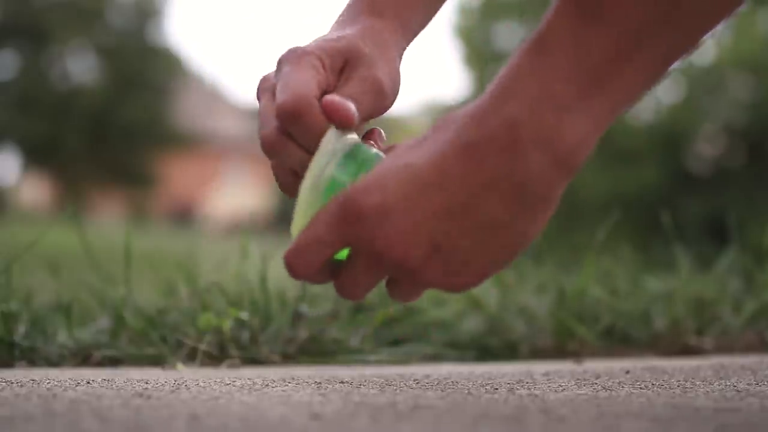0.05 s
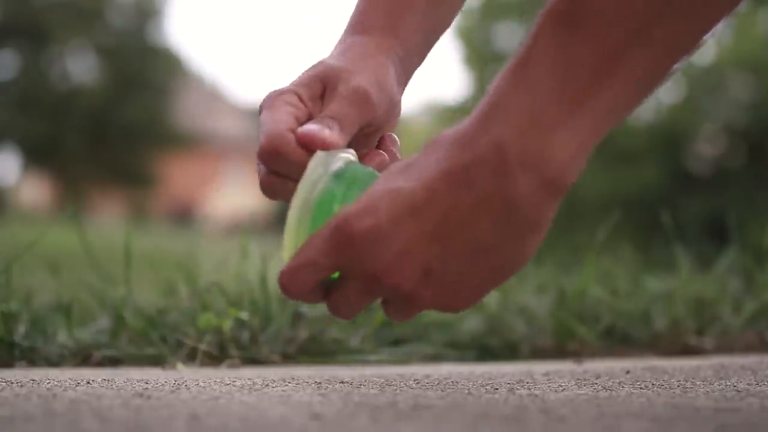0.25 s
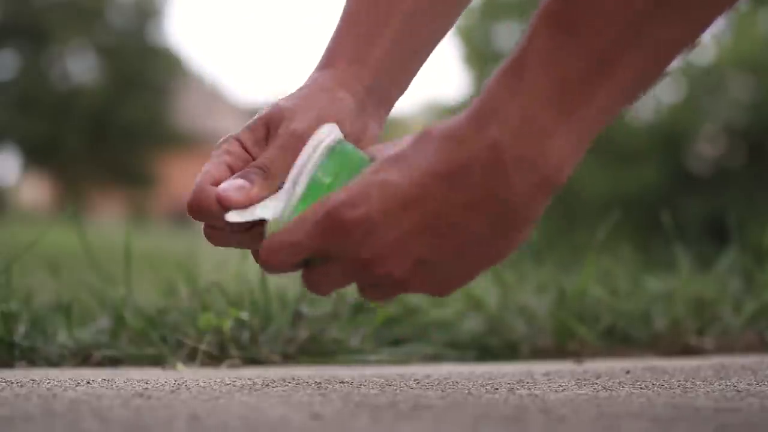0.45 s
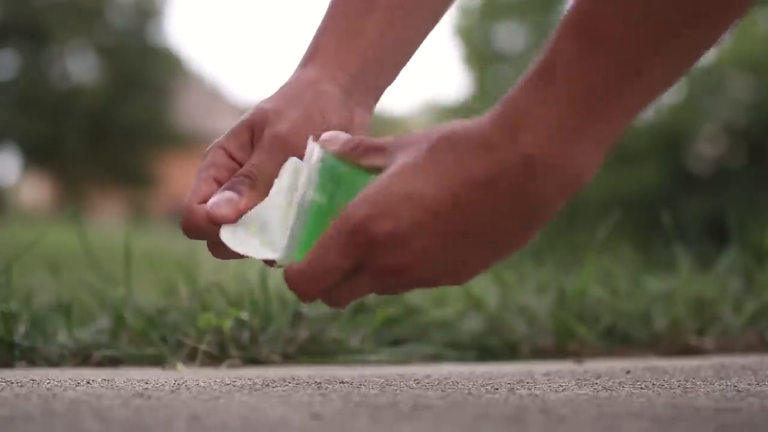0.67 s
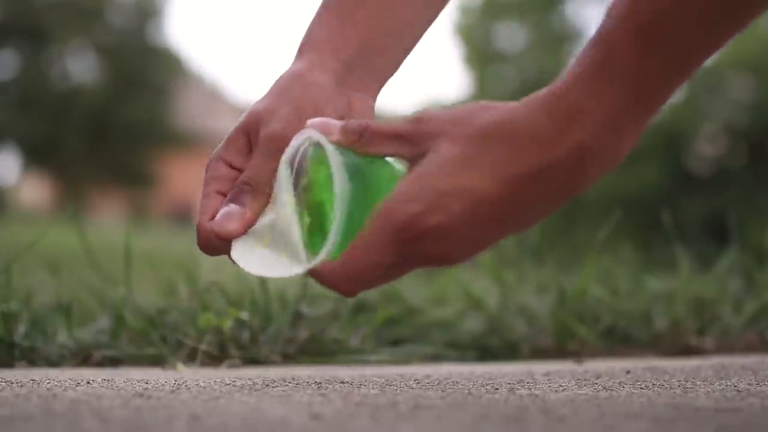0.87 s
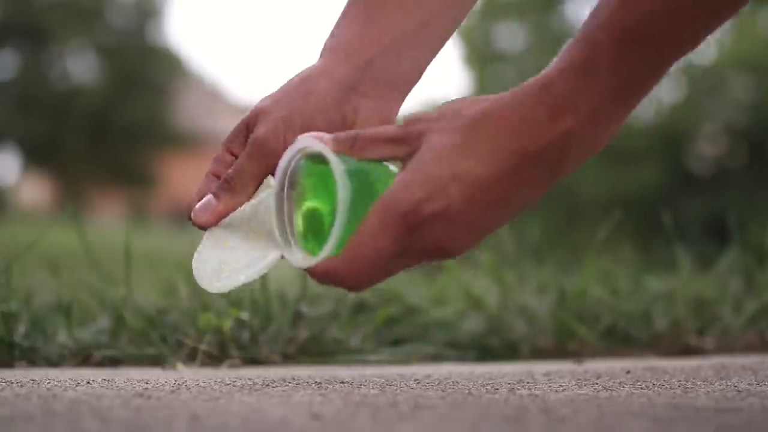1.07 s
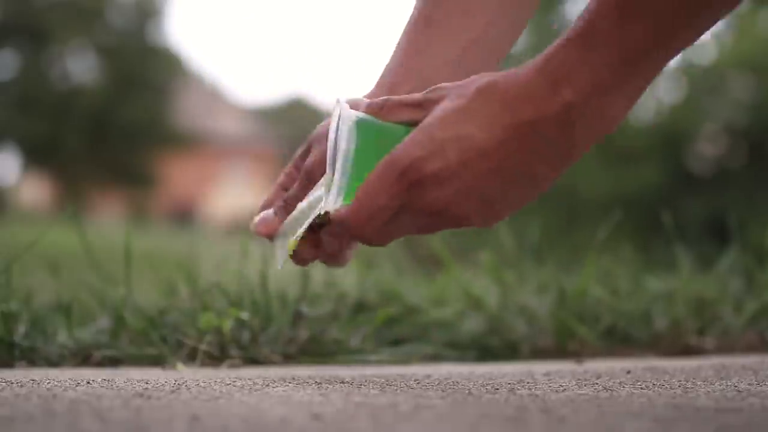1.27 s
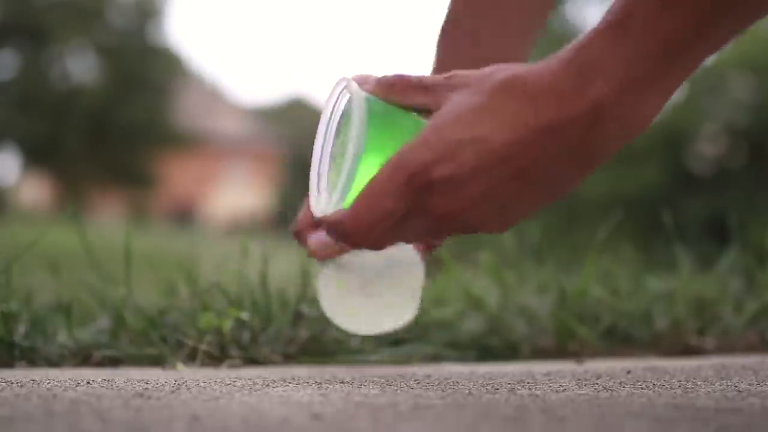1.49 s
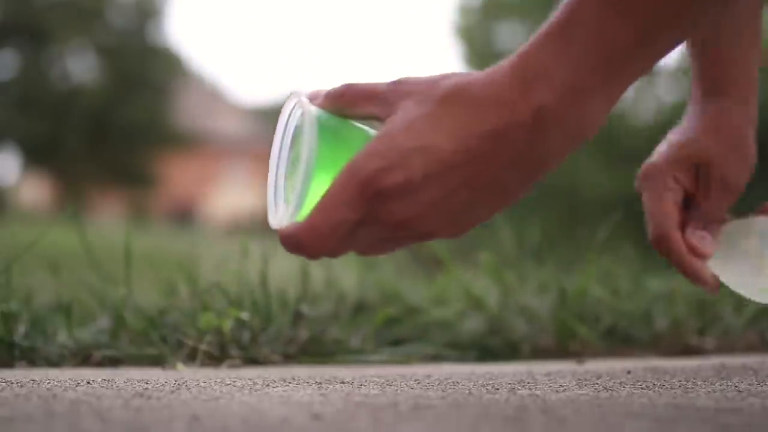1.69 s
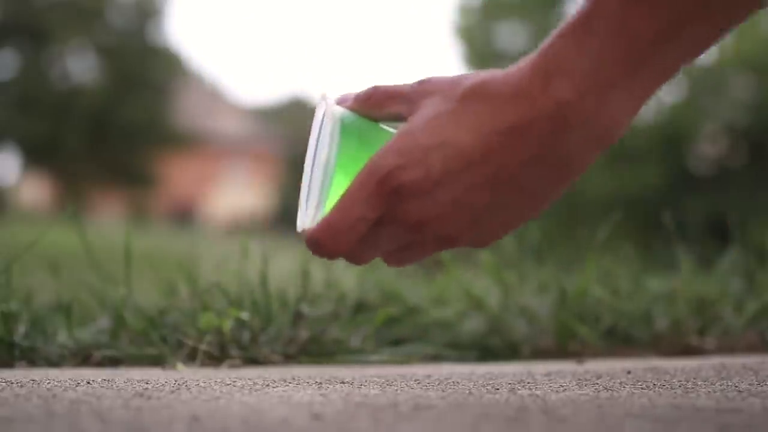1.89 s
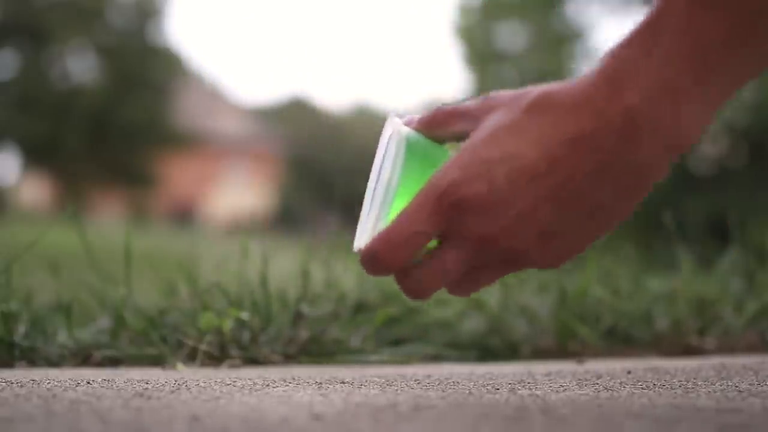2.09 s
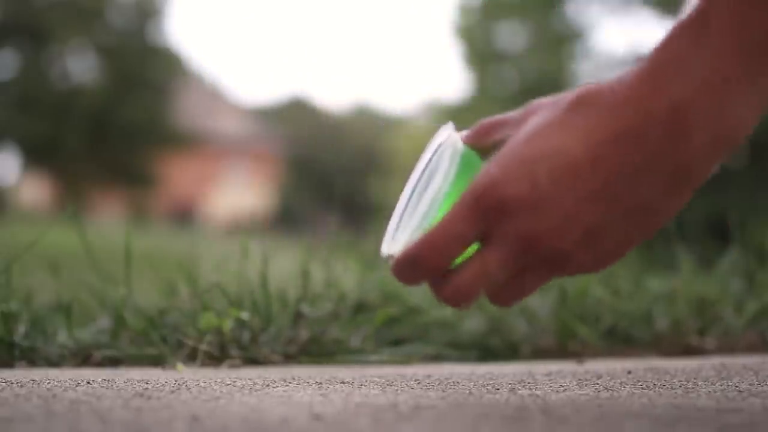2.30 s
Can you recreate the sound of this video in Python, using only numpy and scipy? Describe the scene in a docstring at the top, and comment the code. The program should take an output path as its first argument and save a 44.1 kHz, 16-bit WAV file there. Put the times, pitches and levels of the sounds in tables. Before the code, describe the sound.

A plastic lid peels off a small cup with sharp snaps and crackles, outdoors.

```python
"""In a garden, insects shrill, a far motor hums and a breeze rumbles on the microphone. Close by, fingers rub a
small plastic cup and pick at its tab; each slip or buckle of the film lid snaps. Now and then a soft low pop
sounds. The seal gives way with a short squeal and crackles as it tears. The loose lid flutters, twangs free at
about one second and is crumpled with more snaps, leaving mostly the garden at the end. Throughout, the recorder
turns everything down after loud snaps and holds back the peaks."""
import sys
import numpy as np
from scipy import signal
from scipy.fft import rfft, irfft
from scipy.io import wavfile
from scipy.ndimage import uniform_filter1d, minimum_filter1d

SR = 44100
rng = np.random.default_rng(int(sys.argv[2]) if len(sys.argv) > 2 else 0)


def wav_record(signal):
    """Record a signal, one row per channel, as 16-bit PCM in the file named by sys.argv[1]."""
    frames = np.transpose(np.atleast_2d(signal))
    bounded = np.clip(frames, -1, 1)
    # unit amplitude maps onto the largest positive 16-bit level
    quanta = np.round(bounded * 32767).astype(np.int16)
    wavfile.write(sys.argv[1], SR, quanta)


N = 108045

# Most levels are relative: the functions below scale the sounds further.
# tone of the garden's background hiss (frequency [Hz], level [dB])
AIR_TONE = [(20, -6.5), (45, -3.5), (75, -4), (115, 5), (160, -1), (230, -1.5), (330, -4), (700, -8),
            (1100, -3), (1700, -13), (2600, -17.5), (4000, -21.5), (6000, -26.5), (7800, -23.5),
            (9000, -27.5), (16000, -37)]
# hum of the far motor (time [s], lowest note [dB], octave above [dB])
MOTOR_LEVELS = [(0, -42.5, -60), (.38, -42.5, -52), (.8, -44.5, -50), (1.3, -54, -62), (1.7, -51, -45.5),
                (1.9, -48.5, -43), (2.15, -51, -49.5), (2.45, -44, -54)]
# tone of the insect chorus (frequency [Hz], level [dB])
CHORUS_TONE = [(5500, -62), (6400, -20), (6650, -8), (6820, -7.5), (7000, -1.5), (7150, -21), (7380, -15.5),
               (8500, -38)]
# swelling of the chorus (time [s], level [dB])
CHORUS_SWELL = [(0, -48), (.6, -46.5), (1.2, -48), (1.7, -45), (1.83, -43.5), (1.92, -52.5), (2.05, -44.5),
                (2.16, -48.5), (2.29, -44.5), (2.45, -53.5)]
# gusts on the microphone (time [s], level [dB])
GUSTS = [(0, -35), (.1, -66), (.52, -59), (.66, -35.5), (.9, -44.5), (1.1, -72), (1.37, -45), (1.45, -75)]
# finger strokes on the plastic (middle time [s], half length [s], level [dB])
STROKES = [(0.026, 0.022, -39.5), (0.065, 0.012, -38.5), (.169, 0.0024, -38), (0.918, 0.038, -38),
           (1.431, 0.0045, -20.5), (1.584, 0.018, -40.5), (1.696, 0.079, -40), (2.164, 0.0075, -38)]
# tone of a stroke (frequency [Hz], level [dB])
STROKE_TONE = [(300, 5), (1300, 7), (3500, 2.5), (5500, 1.5), (8000, -22), (16000, -15)]
# snaps (time [s], film pitch [Hz], film level [dB], wall pitch [Hz], body level [dB], crack level [dB])
SNAP_EVENTS = [(0.1469, 1900, -14.5, 1190, -17, -34), (0.1725, 1620, -15.5, 734, -28, -54),
               (0.2102, 1400, -5.5, 3750, -19, -52), (0.3044, 5540, -26, 564, -47, -41),
               (0.316, 750, -20, 1620, -30.5, -48), (0.4322, 5280, -1, 1630, 2, -12),
               (0.4623, 3630, -7, 1800, -6.5, -36), (0.4883, 2600, -3, 1840, -5.5, -46),
               (0.5033, 2220, -11, 3550, -26, -49), (0.5118, 3920, -11, 2410, -11, -17),
               (0.5196, 2100, -12, 3660, -8.5, -20), (0.5364, 4460, -20, 2100, -24, -30),
               (0.567, 4020, -14, 2340, -11, -37), (0.573, 4200, -24, 1560, -22, -37),
               (0.5948, 1920, -22.5, 1040, -23.5, -69), (0.634, 920, -13.5, 2040, -12.5, -20.5),
               (0.6511, 2420, -12, 1630, -10, -36), (0.6757, 1800, -23, 3420, -19.5, -37),
               (0.687, 1780, -23, 2670, -28, -55), (0.7189, 1770, -14.5, 614, -18.5, -55),
               (0.7683, 3450, -22, 1190, -15.5, -49), (0.772, 1850, -33, 1100, -15.5, -44),
               (0.784, 1480, -25, 4930, -15.5, -28), (0.7887, 5200, -16.5, 2750, -11, -26),
               (0.7978, 2750, -28, 1130, -16, -20), (0.8089, 5900, -15, 2890, -22, -28),
               (0.8125, 4930, -14, 3560, -20, -21), (0.8164, 5000, -18, 3360, -28, -18),
               (0.8308, 5300, -13, 2700, -13, -15), (0.8587, 2860, -22, 1130, -22, -31),
               (0.8643, 5700, -25, 1970, -20.5, -37), (0.901, 5180, -10, 2800, -9, -7),
               (0.906, 1720, -15, 3100, -17, -31), (0.9171, 3480, -15.5, 2600, -17, -26),
               (0.9606, 1250, -24, 555, -22, -47), (0.968, 3560, -22, 4570, -32, -36),
               (0.9728, 4440, -19.5, 1940, -35, -36), (0.9793, 1400, -14.5, 540, -14, -25),
               (0.982, 1920, -25, 590, -19.5, -28), (1.0141, 4500, 3.5, 1930, -8, -1),
               (1.0241, 3100, -10, 1950, -7, -17), (1.0262, 4450, 2, 3320, 1, -1),
               (1.0288, 2860, 3, 590, -10, 6.5), (1.0365, 5040, -7, 2970, -11, -23),
               (1.043, 3450, -9, 1050, -9, -20), (1.046, 3070, -15, 4940, -5, -8),
               (1.0472, 3380, -7, 4960, -13, -15), (1.0504, 3620, -10, 2640, -12, -1.5),
               (1.058, 3400, -12, 2000, -8.5, -26), (1.0951, 3140, -17, 1100, -11.5, -30),
               (1.1094, 1690, -4.5, 2700, -6, -33), (1.1389, 3095, -19, 1420, -23, -40),
               (1.156, 3460, -4.5, 5040, -6.5, -9.5), (1.1607, 2080, -14, 5500, -13, -29),
               (1.1754, 2620, -9, 1160, -11.5, -42), (1.2057, 800, -20.5, 1740, -14, -54),
               (1.2632, 1910, -28, 2950, -23.5, -45), (1.3067, 1440, -29, 3360, -28.5, -42),
               (1.3946, 5600, -10, 2550, -14, -15), (1.3988, 4900, -14, 2460, -18.5, -9),
               (1.4048, 5740, -11, 3570, -13, -22), (1.407, 4970, -1, 3500, -3, -9),
               (1.4142, 5180, 9, 2460, -11, -8), (1.4354, 5060, -3, 3050, -7.5, -10),
               (1.4442, 3430, -25, 4950, -17, -24), (1.5511, 1680, -21, 2540, -21, -53),
               (1.6138, 3230, -25, 2440, -5.5, -22), (1.618, 3500, 3.5, 1365, -2.5, -4),
               (1.6361, 5300, 4.5, 2780, -4.5, -7), (1.809, 1410, -25, 560, -24.5, -40),
               (1.8751, 3180, -20, 1160, -20, -64), (2.1188, 3500, -28.5, 575, -33.5, -32.5)]
# the cup's own notes (pitch [Hz], level [dB], time to fade by 60 dB [s])
CUP_NOTES = [(624, -11, .014), (1181, -2, 0.022), (1750, -0.5, 0.012), (2355, 2, 0.005), (3446, 4, 0.013),
             (4295, -0.5, 0.0073), (5250, 1, 0.0041), (5800, -5.5, 0.0091)]
# tone of bright cracks and ticks (frequency [Hz], level [dB])
CRACK_TONE = [(1000, -30), (5000, 7), (7500, 0), (9000, 2), (11000, 0), (13000, -1.5), (16000, -4.5)]
# tone of the duller crackle and rattle (frequency [Hz], level [dB])
CRACKLE_TONE = [(170, -33), (380, -4.5), (900, -2.5), (1700, -1), (2600, -1.5), (3600, -0.5), (4500, -6),
                (5600, -6.5), (7500, -15), (11000, -27), (16000, -23.5)]
# soft low pops and dull clicks (time [s], level [dB])
LOW_POPS = [(.155, -23), (.175, -20.5), (0.2539, -20), (.272, -19), (1.026, -17.5)]
# tone of a low pop (frequency [Hz], level [dB])
LOW_POP_TONE = [(30, -10), (200, 2.5), (500, -8.5), (1500, -16), (6000, -35.5), (16000, -38.5)]
# crackle as the seal tears and the film rubs (time [s], level [dB])
TEAR_LEVEL = [(.429, -59), (.435, -11), (.447, -16.5), (.47, -19), (.5, -31), (.52, -20.5), (.55, -49.5),
              (.755, -60), (.775, -35.5), (.815, -35), (.85, -69), (.91, -36.5), (.95, -38), (.99, -27),
              (1.03, -16.5), (1.052, -20), (1.08, -61), (1.39, -42.5), (1.405, -21), (1.436, -24.5),
              (1.46, -38), (1.6, -57), (1.62, -21), (1.655, -43), (1.72, -61)]
# squeal as the seal first gives way (time [s], pitch [Hz], level [dB])
SQUEAL = [(.432, 5564, -36), (.4337, 5155, -9), (.4355, 5080, -20), (.4365, 1494, -4), (.441, 1770, -1.5),
          (.445, 1690, -10), (.456, 1690, -29)]
# flutter as the lid is bent back, freed and folded (time [s], level [dB])
FLUTTER_LEVEL = [(.5, -46), (.57, -46), (.74, -47.5), (.94, -61), (.975, -37), (1.0, -27), (1.035, -28),
                 (1.06, -31), (1.12, -47)]
# hollow notes of the loose lid (pitch [Hz], level [dB])
LID_NOTES = [(320, -1), (460, -2.5), (610, 2.5), (790, 1.5), (910, 2), (1070, -9)]
# the lid's lowest note as it springs free (time [s], pitch [Hz], level [dB])
LID_TWANG = [(.968, 285, -46), (.984, 303, -25), (1.003, 345, -31), (1.03, 258, -30), (1.05, 262, -26),
             (1.073, 282, -28), (1.09, 315, -38), (1.113, 342, -28), (1.135, 365, -46)]
# tone of the reflections (frequency [Hz], level [dB])
ECHO_TONE = [(200, 3), (2000, 4), (5500, 1), (8000, -10), (16000, -17)]


def amp(db):
    """Turns decibels into a number to multiply by."""
    return 10 ** (np.asarray(db) / 20)


def unit(x):
    """Scales a sound to an average power of 1."""
    return x / np.sqrt(np.mean(x ** 2) + 1e-20)


def unit_hit(x):
    """Scales a short sound to the energy of one millisecond at full level."""
    return x * np.sqrt(SR / 1000 / (np.sum(x ** 2) + 1e-20))


def curve(points):
    """Joins rows (time, value, ...) with straight lines; one curve per value column."""
    times, *columns = np.transpose(points)
    return [np.interp(np.arange(N) / SR, times, column) for column in columns]


def during(table):
    """On between a table's first and last time, off outside."""
    t = np.arange(N) / SR
    return (t > table[0][0]) * (t < table[-1][0])


def level_at(tone, hz):
    """Looks up a tone table's level in dB at the given frequencies."""
    table_hz, db = np.transpose(tone)
    return np.interp(np.log(hz + 1), np.log(table_hz + 1), db)


def colour(x, tone, size=4096):
    """Filters a sound to follow a tone table, with no ringing before the sound starts."""
    log_gain = np.log(amp(level_at(tone, abs(np.fft.fftfreq(size, 1 / SR)))))
    response = np.exp(np.conj(signal.hilbert(log_gain)))
    taps = np.fft.ifft(response).real[:size // 2]
    return signal.fftconvolve(x, taps)[:len(x)]


def add(mix, start_s, sound):
    """Mixes a sound in at the given time."""
    part = mix[max(round(start_s * SR), 0):][:len(sound)]
    part += sound[:len(part)]


def drift(rate_hz):
    """Random wavering, mostly slower than the given rate."""
    rolloff = 1 + (np.fft.rfftfreq(N, 1 / SR) / rate_hz) ** 4
    return unit(irfft(rfft(rng.standard_normal(N)) / rolloff, N))


def grains(per_s, spread_db):
    """Tiny clicks of uneven size at random times."""
    size = amp(spread_db * np.minimum(rng.exponential(1, N), 3.5)) * rng.choice([-1, 1], N)
    return size * (rng.random(N) < per_s / SR)


def garden_air():
    """A distant wash of noise, with patches of its tone drifting up and down."""
    frames = dict(nperseg=2048, noverlap=1536)
    hz, _, spectrum = signal.stft(rng.standard_normal(N), SR, **frames)
    patches = uniform_filter1d(rng.standard_normal(spectrum.shape), size=20, axis=0)  # across pitch
    patches = unit(uniform_filter1d(patches, size=8, axis=1))  # across time
    gain = amp(level_at(AIR_TONE, hz)[:, None] + 2 * patches)
    air = signal.istft(spectrum * gain, **frames)[1][:N]
    return amp(-41) * unit(air)


def motor(pitch_hz=107.5):
    """A far motor hums on a wavering low note and the octave above it."""
    phase = 2 * np.pi * np.cumsum(pitch_hz * (1 + .012 * drift(6.15))) / SR
    return sum(amp(db + 1.2 * drift(14)) * np.sin(k * phase)
               for k, db in enumerate(curve(MOTOR_LEVELS), 1))


def insects(first_s=.036, every_s=.1595, chirp_s=.055, top_hz=8200):
    """A shrill chorus swells and sinks; one insect repeats a thin chirp that rises and falls."""
    chorus = unit(colour(rng.standard_normal(N), CHORUS_TONE))
    chorus *= amp(curve(CHORUS_SWELL)[0] + 1.9 * drift(60))
    from_middle_s = (np.arange(N) / SR - first_s + every_s / 2) % every_s - every_s / 2
    edge = np.minimum((2 * from_middle_s / chirp_s) ** 2, 1)  # 0 mid-chirp, 1 between chirps
    hz = top_hz - 365 * edge + 70 * drift(190)
    level = amp(-54 - 5 * abs(drift(1.8)))
    return chorus + level * (1 - edge) * np.sin(2 * np.pi * np.cumsum(hz) / SR)


def breeze():
    """Light gusts push on the microphone and make it rumble."""
    return amp(curve(GUSTS)[0]) * drift(rate_hz=24.9)


def fingers():
    """Fingertips slide on the cup in short, grainy strokes."""
    t = np.arange(N) / SR
    strokes = sum(amp(db) * np.exp(-((t - middle_s) / half_s) ** 2) for middle_s, half_s, db in STROKES)
    return strokes * unit(colour(grains(per_s=2500, spread_db=5.5), STROKE_TONE))


def swell(t, hz, cycles=.41):
    """Ringing plastic takes a moment to build up, longer for low notes."""
    return (1 - np.exp(-t * hz / cycles)) ** 2


def patch_ring(t, hz):
    """A patch of plastic rings for a few cycles; low notes last longer than high ones."""
    fade_s = .0003 + .75 / hz
    envelope = swell(t, hz) * np.exp(-t / fade_s)
    return unit_hit(np.gradient(envelope * np.sin(2 * np.pi * hz * t)))


def cup_ring(t, detune=.027, spread_db=3.5):
    """The cup's notes ring together; each grip shifts their pitch and strength a little."""
    out = np.zeros(len(t))
    for hz, db, fade_s in CUP_NOTES:
        shift, strength, side = rng.standard_normal(3)
        envelope = swell(t, hz) * amp(-60 * t / fade_s)
        note = np.gradient(envelope * np.sin(2 * np.pi * hz * (1 + detune * shift) * t))
        out += np.sign(side) * amp(db + spread_db * strength) * unit_hit(note)
    return unit_hit(out)


def noise_hit(t, tone, rise_s, fade_s):
    """The noisy part of a snap: a burst that rises fast and dies away."""
    burst = rng.standard_normal(len(t)) * (1 - np.exp(-t / rise_s)) * np.exp(-t / fade_s)
    return unit_hit(colour(burst, tone, size=1024))


def snaps():
    """The film buckles with a bright crack and rings; the knock sets the wall and whole cup ringing."""
    out = np.zeros(N)
    t = np.arange(900) / SR  # time since the snap
    for start_s, film_hz, film_db, wall_hz, body_db, crack_db in SNAP_EVENTS:
        rattle = noise_hit(t, CRACKLE_TONE, rise_s=.00012, fade_s=.0016)
        crack = amp(crack_db + 1) * noise_hit(t, CRACK_TONE, rise_s=.00027, fade_s=.00045)
        film = amp(film_db - .5) * patch_ring(t, film_hz)
        body = amp(-3.5) * cup_ring(t) + amp(-10.5) * rattle - amp(-4.5) * patch_ring(t, wall_hz)
        add(out, start_s, film + amp(body_db) * body + crack)
    return out


def low_pops(fade_s=.0011):
    """Soft low pops and dull clicks: very short bursts of noise with little treble."""
    out = np.zeros(N)
    t = np.arange(1500) / SR
    for start_s, db in LOW_POPS:
        burst = rng.standard_normal(len(t)) * np.exp(-t / fade_s)
        add(out, start_s, amp(db) * unit_hit(colour(burst, LOW_POP_TONE)))
    return out


def tearing():
    """The seal lets go in a dense run of dull slips, with a few bright ticks among them."""
    slips = unit(colour(grains(per_s=2100, spread_db=4), CRACKLE_TONE))
    ticks = unit(colour(grains(per_s=160, spread_db=4), CRACK_TONE))
    return amp(curve(TEAR_LEVEL)[0]) * (slips + amp(-16) * ticks)


def seal_squeal(roughness=.07):
    """The first stretch of seal squeals as it slips, dropping in pitch into the ring of the cup."""
    hz, db = curve(SQUEAL)
    phase = 2 * np.pi * np.cumsum(hz * (1 + roughness * drift(810))) / SR
    return amp(db) * np.sin(phase) * during(SQUEAL)


def lid_flutter(fade_s=.022):
    """The loose lid flexes, and many tiny clicks set its hollow notes ringing."""
    t = np.arange(SR // 10) / SR
    flutter = np.zeros(N)
    for hz, db in LID_NOTES:
        note = amp(db - 60 * t / fade_s) * np.sin(2 * np.pi * hz * t)
        flutter += signal.fftconvolve(grains(per_s=1100, spread_db=.9), note)[:N]
    return amp(curve(FLUTTER_LEVEL)[0]) * unit(flutter) * during(FLUTTER_LEVEL)


def lid_twang():
    """The pulled lid's lowest note rises, sags, then twangs upward as it springs free."""
    hz, db = curve(LID_TWANG)
    return amp(db) * np.sin(2 * np.pi * np.cumsum(hz) / SR) * during(LID_TWANG)


def reflections(x, near_fade_s=.0093, far_fade_s=.05, echo_s=.0052):
    """Sound bounces off hands, cup and pavement, with a faint tail; hands and grass soak up treble."""
    t = np.arange(SR // 3) / SR
    near, far = rng.standard_normal((2, len(t))) * (t > .0015)
    near *= amp(-60 * t / near_fade_s)
    far *= amp(-60 * t / far_fade_s)
    bounces = amp(-20) * near / np.linalg.norm(near) + amp(-18) * far / np.linalg.norm(far)
    add(bounces, echo_s, amp([-21]))  # one close echo
    return x + colour(signal.fftconvolve(x, bounces)[:N], ECHO_TONE)


def scene():
    """The close sounds in front of the garden, in one channel."""
    close = snaps() + tearing() + seal_squeal() + lid_flutter() + lid_twang() + fingers() + low_pops()
    return (reflections(close) + garden_air() + motor() + insects() + breeze())[None]


def record(dry, threshold_db=-17, recover_db_per_s=23.5, lag_s=.0064, hold_s=.00026, top_hz=16200):
    """The recorder turns down after loud snaps, holds back the peaks and cuts the highest treble."""
    keep = np.exp(-1 / (lag_s * SR))
    smoother = [1 - keep], [1, -keep]
    power_db = 10 * np.log10(signal.lfilter(*smoother, dry[0] ** 2) + 1e-12)
    wanted_cut_db = .51 * np.maximum(power_db - threshold_db, 0)
    recovery_db = np.arange(N) * recover_db_per_s / SR
    cut_db = np.maximum.accumulate(wanted_cut_db + recovery_db) - recovery_db  # cuts ease off slowly
    ducked = dry * amp(-signal.lfilter(*smoother, cut_db))
    hold = max(int(hold_s * SR), 2)
    peak_gain = 1 / np.maximum(abs(ducked), 1)
    peak_gain = uniform_filter1d(minimum_filter1d(peak_gain, hold), hold)
    treble_cut = signal.firwin(255, top_hz, window=("kaiser", 7), fs=SR)
    return signal.oaconvolve(ducked * peak_gain, treble_cut[None], "same")


dry = scene()
out = record(dry)
wav_record(out)
```